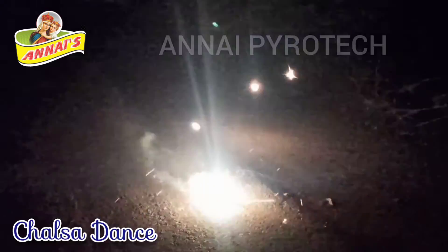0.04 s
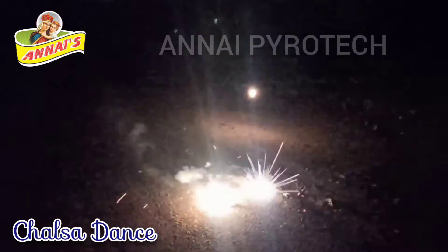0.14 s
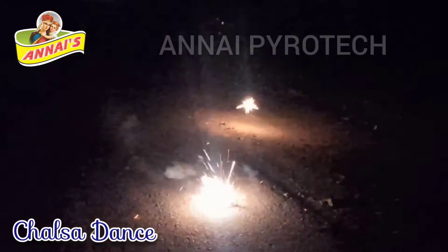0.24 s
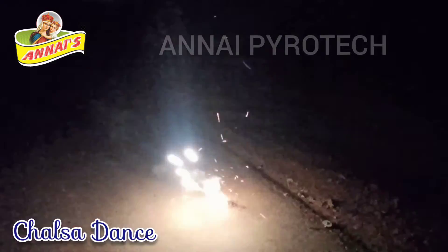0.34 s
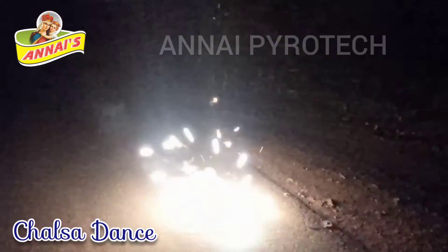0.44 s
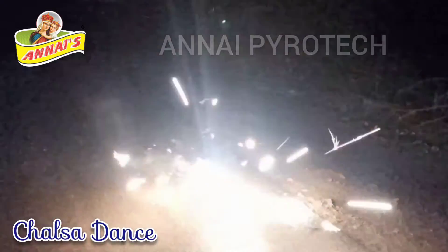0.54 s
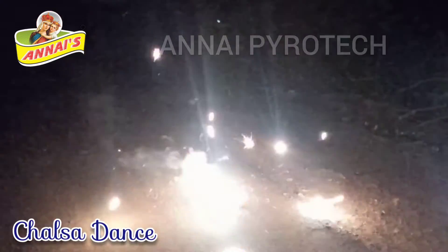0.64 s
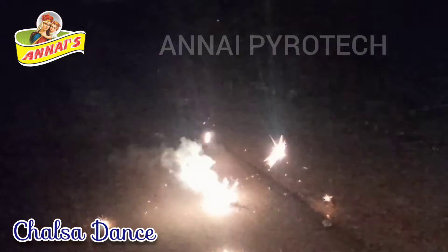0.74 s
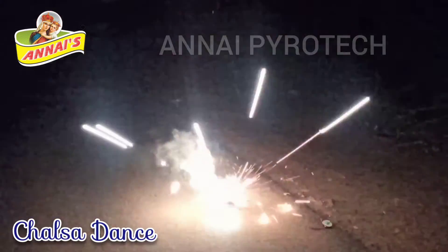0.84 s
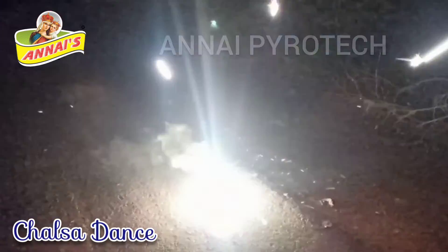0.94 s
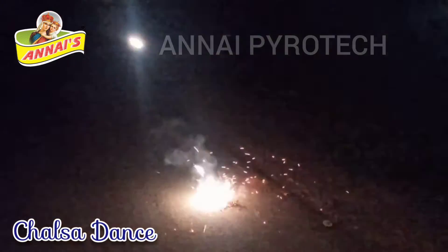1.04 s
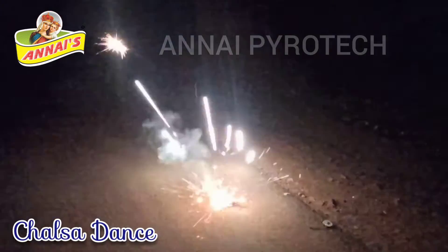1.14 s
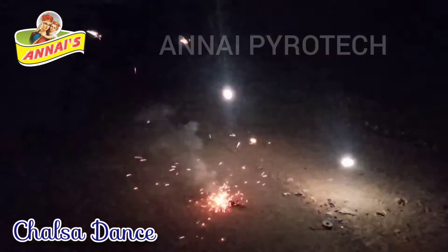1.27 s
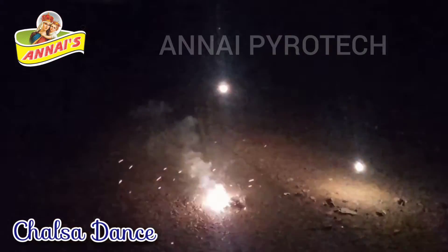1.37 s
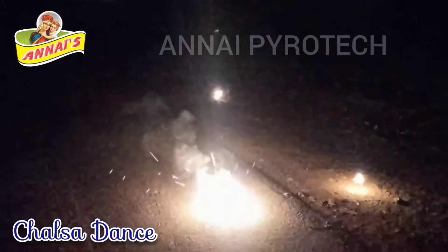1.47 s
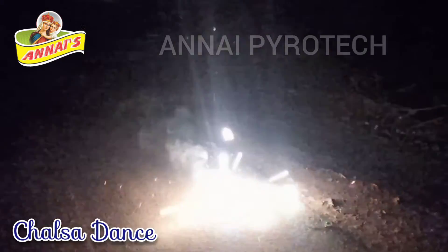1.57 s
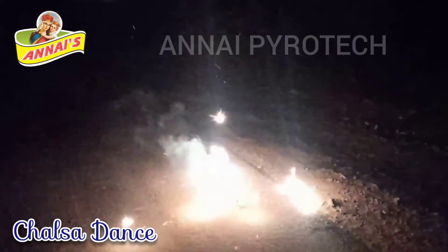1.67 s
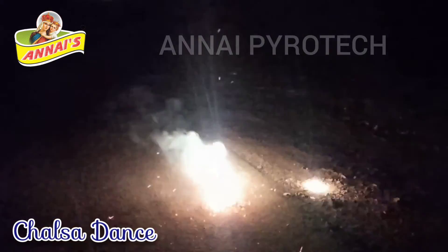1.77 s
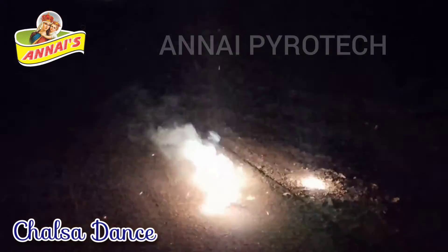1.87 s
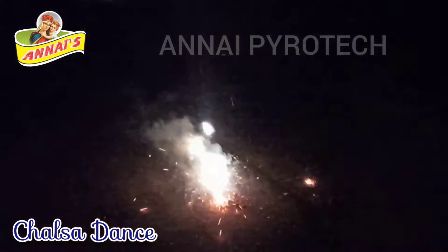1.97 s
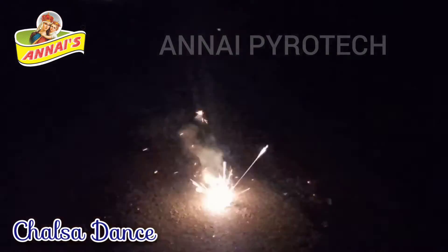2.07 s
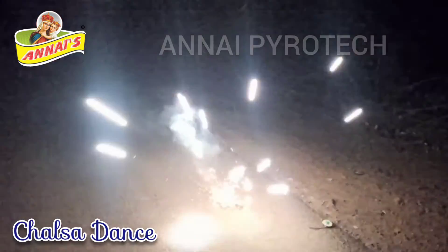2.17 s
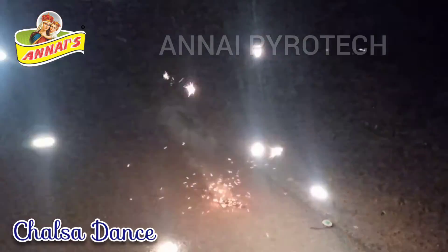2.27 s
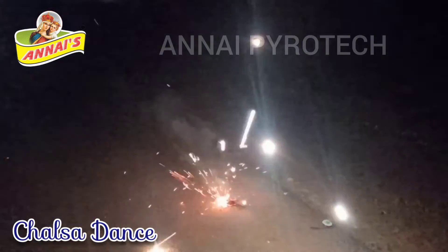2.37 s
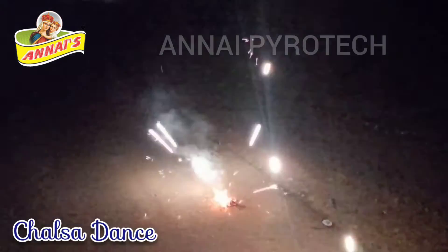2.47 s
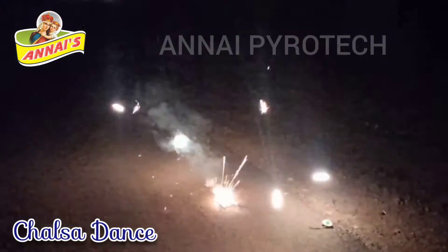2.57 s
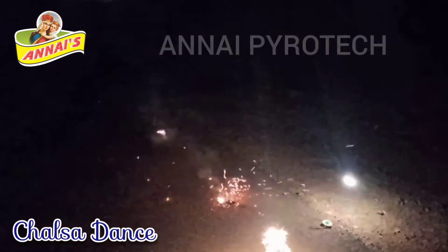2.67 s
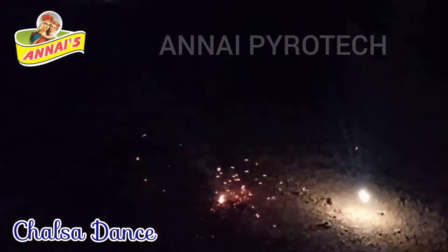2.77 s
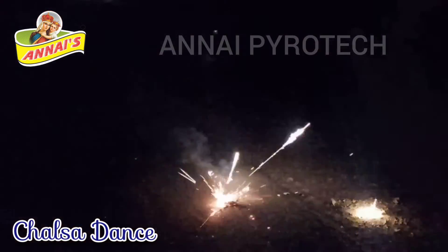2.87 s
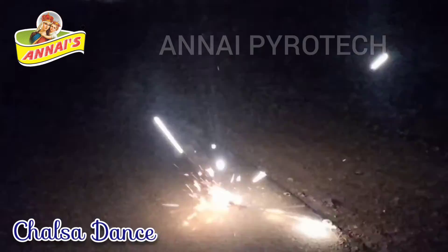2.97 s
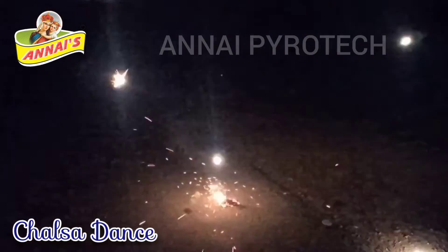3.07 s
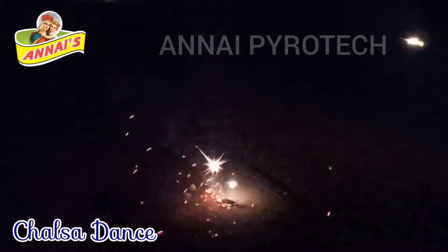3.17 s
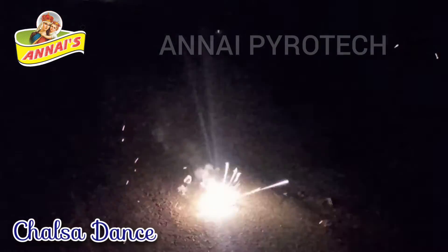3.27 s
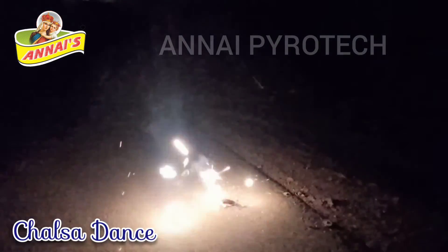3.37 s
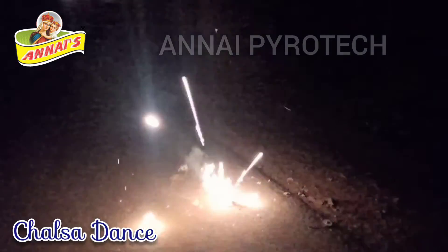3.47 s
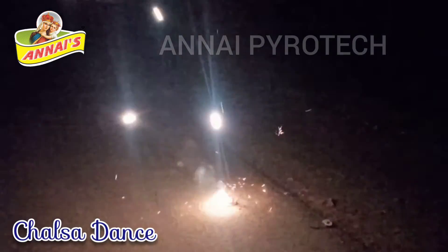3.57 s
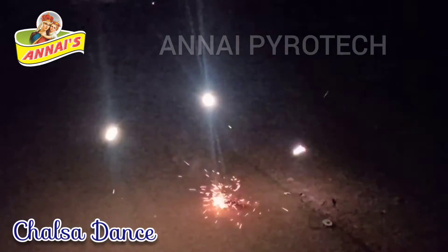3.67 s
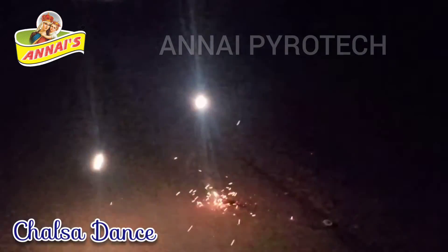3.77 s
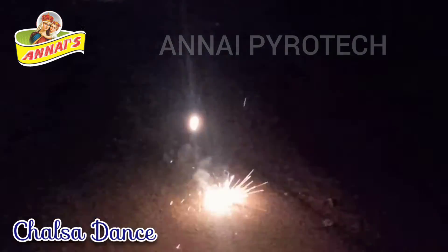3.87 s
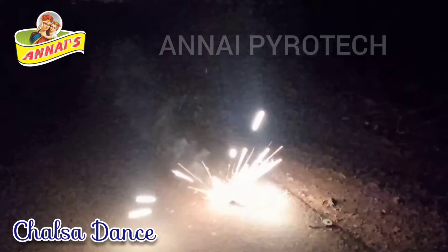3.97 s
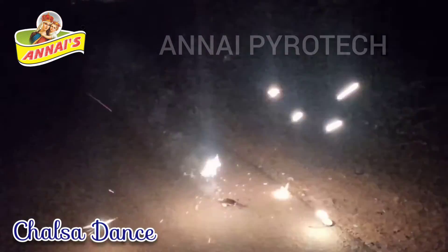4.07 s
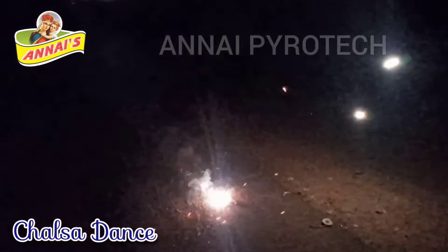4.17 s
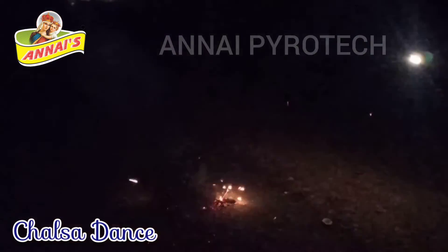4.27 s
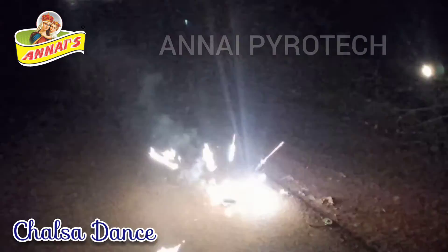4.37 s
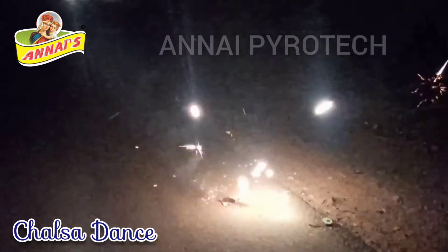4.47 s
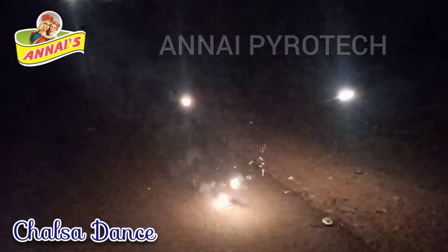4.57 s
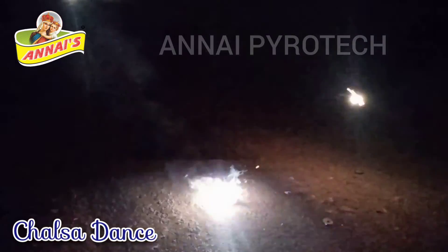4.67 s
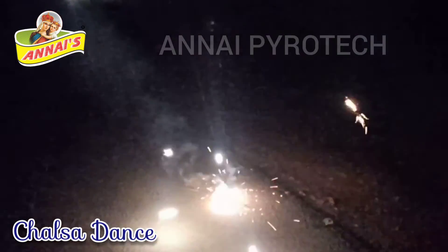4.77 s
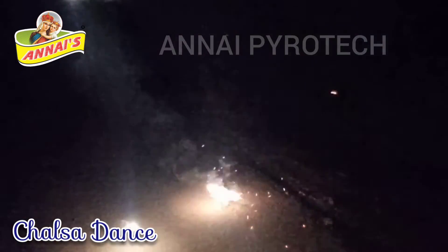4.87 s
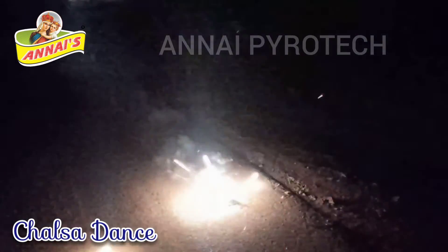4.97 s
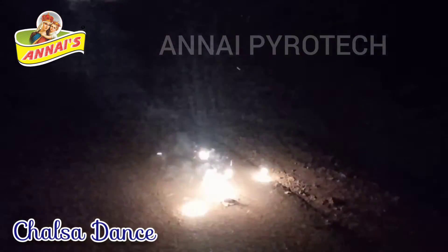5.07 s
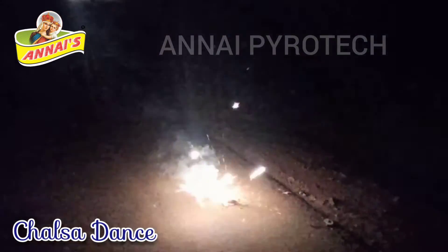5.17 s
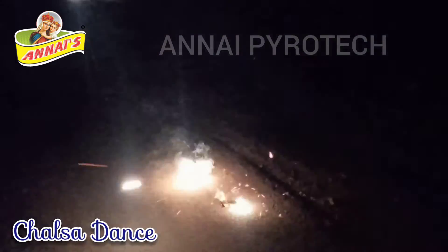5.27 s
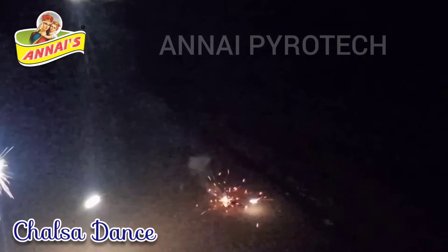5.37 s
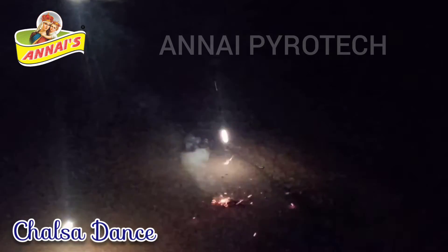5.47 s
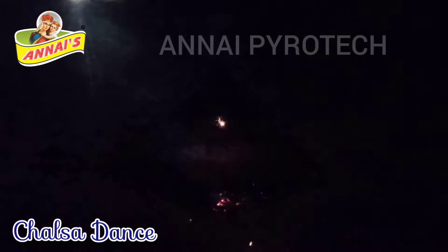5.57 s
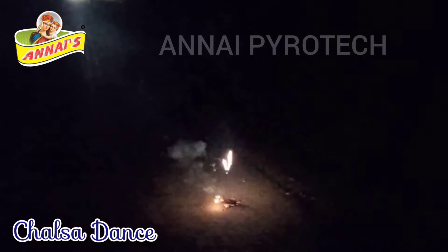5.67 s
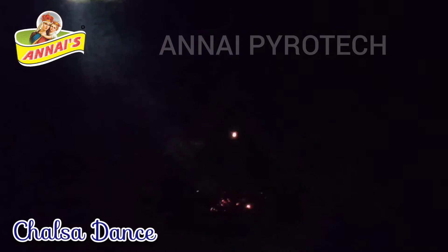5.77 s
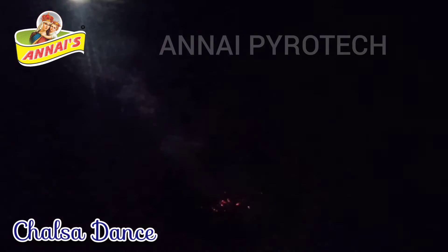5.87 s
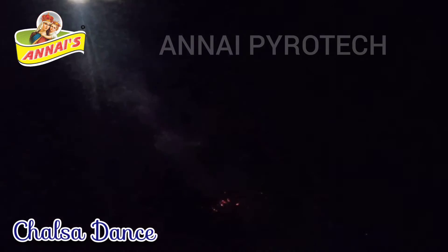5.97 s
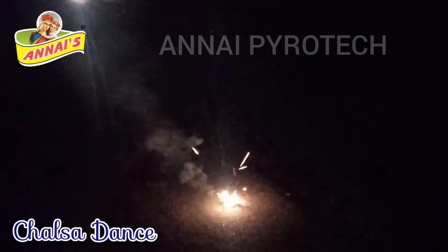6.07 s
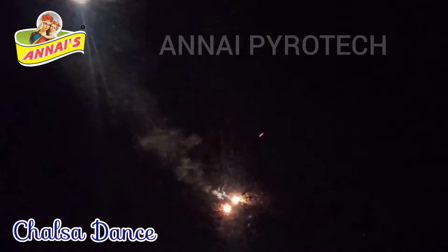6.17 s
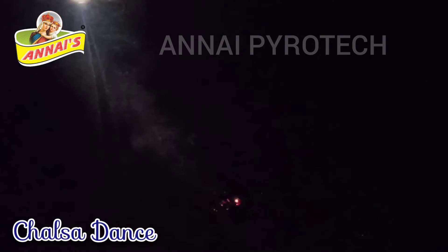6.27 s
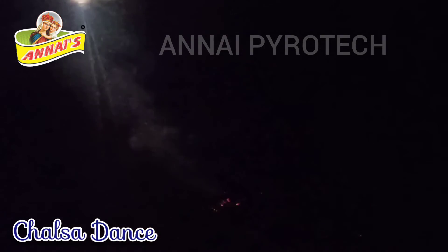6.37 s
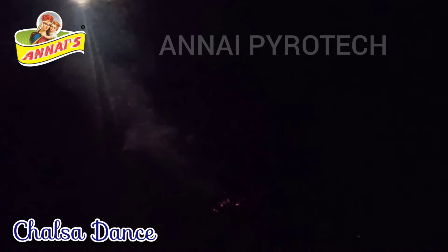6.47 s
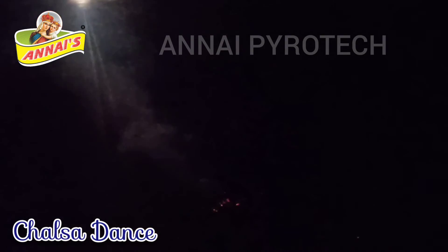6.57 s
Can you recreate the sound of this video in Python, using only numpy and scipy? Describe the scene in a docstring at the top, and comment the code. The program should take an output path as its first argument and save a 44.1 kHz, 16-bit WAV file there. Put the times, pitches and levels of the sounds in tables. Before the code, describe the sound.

A ground firework crackles outdoors at night, sharp irregular pops and heavier bangs with hissy echoes, thinning out to a few last snaps.

```python
"""A low rumble and faint hiss open the night, and at once a ground firework crackles on a dirt road,
a few metres from a small camera's pair of microphone ports. Its pellets crack one after another as shocks
amid a spatter of noise, the big ones with a thump of air (one low cycle), a few as longer, rougher bursts.
The surroundings scatter each crack back as a hissy wash of fading noise; stray sparks tick faintly."""
import sys
import numpy as np
from scipy import signal
from scipy.fft import rfft, irfft
from scipy.io import wavfile
from scipy.ndimage import uniform_filter1d

SR = 44100
rng = np.random.default_rng(int(sys.argv[2]) if len(sys.argv) > 2 else 0)


def output_pcm(signal):
    """Save a mono or channel-first signal as 16-bit PCM at the path in sys.argv[1].

    Samples are clipped to [-1, 1] before scaling.
    """
    pcm = np.clip(np.atleast_2d(signal).T, -1, 1) * 32767
    wavfile.write(sys.argv[1], SR, np.round(pcm).astype(np.int16))


N = 292383

# colour of the night's background: pitch_hz, density_db (dB per Hz, relative)
NIGHT_COLOUR = [(30, -42), (70, -16.5), (109, -3), (190, -10.5), (250, -14), (420, -23.5), (700, -24),
                (1200, -34), (3500, -36.5), (5200, -44), (7500, -27.5), (9000, -65), (13000, -43.5),
                (16000, -44.5)]
# narrow whines within the hiss: pitch_hz, width_hz, gain_db
NIGHT_WHINES = [(4120, 110, 15), (7450, 260, 7)]
# likeness of left and right in the background: pitch_hz, likeness (-1 to 1)
NIGHT_LIKENESS = [(150, 0.95), (700, 0.2), (2000, 0), (8000, .1)]
# the distant rumble comes and goes: time_s, gain_db
RUMBLE_SWELL = [(0, 4), (1.3, -4), (2.7, 0), (3.3, 2.5), (5, 1), (6.5, 2)]
# tilt between the ports in every layer but the thumps: pitch_hz, left_over_right_db
PORT_BALANCE = [(100, -0.5), (700, 2.5), (2600, -2), (4000, 0), (6000, -1.5), (8300, -5.5), (12000, -2.5),
                (15000, -7.5)]
# pellets that burst: start_s, level_db, bright_db (treble tilt),
# boom_db (thump more or less than is usual for the size)
PELLETS = [(0.03, -15.5, 1.5, 1), (0.1481, -22.0, -7.5, -2), (0.2164, -33, 1, 0), (0.2239, -30, 3, 3),
           (0.2598, -14, -3, 6), (0.313, -22, 5, 0), (0.3617, -20.5, 2.0, 0), (0.3928, -22.5, -2, -13),
           (0.4906, -17.5, 1, -5), (0.5316, -29.5, -2, 0), (0.5776, -20, 1.5, -6),
           (0.5816, -16.5, -3.5, -2), (0.6062, -21.0, -1.5, 3), (0.667, -18.0, -4.5, 2),
           (0.7707, -23, 7, -2), (0.8514, -23.5, 9, -4), (0.859, -25, 5, 0), (0.8902, -18, 2.0, 11),
           (0.9181, -16.5, -1.5, 0), (0.9459, -21, 8.5, -7), (1.044, -21, -7.5, -7), (1.0628, -28, 3, 0),
           (1.0846, -24.5, 2, -4), (1.1623, -23, 3.5, -11), (1.1807, -23, 2, -9), (1.225, -15.5, 2, -4),
           (1.4555, -24.5, -1.5, -11), (1.4942, -29.5, 2.5, 0), (1.5355, -20.5, -1.5, -6),
           (1.5542, -16.0, -6, -1), (1.5852, -21, -8, -8), (1.6593, -14.5, 0, 1), (1.7011, -19.5, -4, 12),
           (1.8375, -34.0, -3.5, 0), (1.879, -21, 0.5, -11), (1.9078, -34.5, 4, 0),
           (1.9484, -19.5, 3.0, 3.5), (1.9712, -22, -0.5, -14), (1.992, -33, 1, 0), (2.0947, -34, 10, 2),
           (2.116, -38.5, 17.5, 0), (2.1938, -17, -0.5, 8), (2.2176, -15.5, -2, 7.5),
           (2.23, -18.5, 1, 10.5), (2.4552, -20, -4, -5), (2.5458, -16.5, -0.5, 7.5), (2.702, -17, 0, 3.5),
           (2.9728, -15.5, 1.5, 5), (3.0552, -15, 1.5, -4), (3.2439, -32.5, 9, 0), (3.281, -34, 6, 0),
           (3.3923, -15.5, 3, -4), (3.4316, -21, 6.0, 0), (3.4927, -21.5, 5, -5), (3.5664, -18, 2, 8),
           (3.7143, -18.5, 0.5, 4), (3.8441, -25.0, 2.5, 0), (3.99, -19.5, 1.5, -1),
           (4.0234, -18.5, -0.5, 6), (4.069, -16.5, -5.0, 5), (4.0791, -19.5, 5.5, -8),
           (4.308, -19.5, 3.5, 5.5), (4.4435, -18, 0, 6.5), (4.482, -23.5, -7.5, 6),
           (4.643, -36.5, 8, -2.5), (4.7081, -38.5, -5, 0), (4.7405, -36.5, -10, 0), (4.7734, -40, 5, 0),
           (4.8108, -14.5, 0.5, -1.5), (4.8661, -22, -2, -11), (4.999, -32.5, 7.5, 3),
           (5.0341, -22.5, 0, -16), (5.0402, -26, 10.5, -8), (5.053, -33.0, 1.5, 0),
           (5.1213, -24.5, 1.5, -9), (5.1387, -26, 9, 0), (5.2446, -16.5, 1, 6.5), (5.2495, -20, -6.5, -13),
           (5.3107, -22, 7, 9), (5.463, -17.5, 0.5, 4), (5.4946, -15.5, 8, 5), (5.519, -17, 1.5, -9),
           (5.647, -33, -3, 0), (5.7217, -24, -2.0, -7), (5.7527, -32.5, 7.5, 0), (6.1331, -25, 8.5, 0)]
# broad colour of a crack at the microphone: pitch_hz, density_db (dB per Hz, relative)
CRACK_COLOUR = [(40, -20.5), (130, -9), (230, 5.5), (450, -0.5), (800, 2), (1600, -2.5), (4500, -6),
                (5300, -10), (8200, 1.5), (9200, -14), (11200, -31), (11800, -9.5), (15000, -12.5),
                (16500, -33.5)]
# one hollow and the resonances of the microphone's housing, on cracks and echoes:
# pitch_hz, width_hz, gain_db
HOUSING_MODES = [(1100, 175, -4.5), (2215, 316, 5.5), (3833, 590, 10.5), (4628, 374, 12), (6520, 700, 7),
                 (7470, 168, 8.5)]
# likeness of left and right in a crack: pitch_hz, likeness (-1 to 1)
CRACK_LIKENESS = [(200, 0.2), (1100, 0.98), (1600, -.5), (2200, 0.75), (4700, 0.81), (5600, 0.95),
                  (12000, 0.07)]
# colour of the scattered echo: pitch_hz, density_db (dB per Hz, relative)
ECHO_COLOUR = [(40, -13), (150, -7.5), (400, 1.5), (800, 1), (1500, -1), (2600, 2), (5200, -3), (6500, 3.5),
               (8300, 3), (9100, -29), (11200, -61), (11700, -5), (15000, -9), (16300, -31)]
# time the echo takes to fall by 60 dB: pitch_hz, decay_s
ECHO_DECAY = [(100, 0.18), (700, 0.35), (3000, 0.45), (7500, 0.55), (14000, 0.44)]
# likeness of left and right in an echo: pitch_hz, likeness (-1 to 1)
ECHO_LIKENESS = [(300, 1), (800, 0.38), (1450, -0.39), (2100, 0.16), (3200, 0.18), (12000, -0.037)]
# longer, rougher bursts, each a crack in a drawn-out spatter: start_s, level_db, length_ms
ROUGH_BURSTS = [(0.205, -29, 3.6), (0.7646, -25, 4.6), (2.0869, -33.5, 3.7), (5.7249, -19.5, 2.3),
                (6.1206, -24, 5.2), (6.129, -32.5, 2.7), (6.1656, -35, 5.2)]

NIGHT_DB = -54.5  # rms before the rumble swells
EDGE_HZ = 16300  # top of the microphone's band
# a full-sized pellet: its crack, its thump and its echo
FULL_DB, THUMP_DB, ECHO_DB = -18, -35.5, -36.5
# dB of thump and of echo gained for each dB of crack: big pellets boom, small ones only snap
THUMP_GROWTH, ECHO_GROWTH = 2, 2.19
# length of the smallest snap, and what a full charge adds to it
SNAP_MS, CHARGE_MS = 0.66, 0.16
# stray sparks tick at random until BURN_S, shortly before the last pellets
BURN_S, SPARKS_PER_S, SPARK_DB = 5.9, 7.7, -46.5
# treble tilt of a rough burst; its thump and echo against its crack
ROUGH_BRIGHT_DB, ROUGH_THUMP_DB, ROUGH_ECHO_DB = 3, -31, -31


def amp(db):
    """Decibels to gain."""
    return 10 ** (np.asarray(db) / 20)


def evened(x):
    """Scales to an rms of one."""
    return x / np.sqrt(np.mean(x ** 2) + 1e-20)


def rfft_hz(size):
    """The frequencies of a spectrum of this many samples."""
    return np.fft.rfftfreq(size, 1 / SR)


def read(points, hz):
    """Joins (Hz, value) points on a log-frequency axis."""
    point_hz, value = np.transpose(points)
    return np.interp(np.log(hz + 1), np.log(point_hz + 1), value)


def humps(modes, hz):
    """The dB curve of a few resonances."""
    return sum(db / (1 + (2 * (hz - centre) / width) ** 2) for centre, width, db in modes)


def add(mix, s, sound):
    """Mixes a stereo sound in, starting at s; whatever falls outside is cut."""
    start = round(s * SR)
    sound = sound[:, max(-start, 0):]
    part = mix[:, max(start, 0):][:, :sound.shape[1]]
    part += sound[:, :part.shape[1]]


def pair(z, likeness, hz):
    """Turns two spectra into a partly alike left and right, tilted by the balance of the ports."""
    same = read(likeness, hz)
    lean_db = read(PORT_BALANCE, hz) / 2
    left = z[0] * amp(lean_db)
    right = (same * z[0] + np.sqrt(1 - same ** 2) * z[1]) * amp(-lean_db)
    return np.array([left, right])


def causal(db):
    """The response with this dB curve that rings only after it is struck."""
    log_gain = np.log(amp(np.r_[db, db[-2:0:-1]]))
    return np.exp(np.conj(signal.hilbert(log_gain)))[:len(db)]


def night(split_hz=300):
    """A slowly swelling low rumble under a faint steady hiss, both cut from one coloured noise."""
    hz = rfft_hz(N)
    z = pair(rfft(rng.standard_normal((2, N))), NIGHT_LIKENESS, hz)
    colour_db = read(NIGHT_COLOUR, hz) + humps(NIGHT_WHINES, hz)
    air = evened(irfft(z * amp(colour_db), N))
    rumble = irfft(rfft(air) / (1 + (hz / split_hz) ** 4), N)
    hiss = air - rumble
    swell = amp(np.interp(np.arange(N) / SR, *np.transpose(RUMBLE_SWELL)))
    return amp(NIGHT_DB) * (hiss + swell * rumble)


def pop(s, db, bright_db, boom_db=0):
    """The size of a pellet sets how long it takes to go off, how much air it shifts and its echo level."""
    size_db = db - FULL_DB
    length_ms = SNAP_MS + CHARGE_MS * amp(size_db)
    thump_db = THUMP_DB + THUMP_GROWTH * size_db + boom_db
    echo_db = ECHO_DB + ECHO_GROWTH * size_db
    return s, db, length_ms, bright_db, thump_db, echo_db


def thumps(bursts, width_s=0.0017, apart_rad=0.77):
    """The hot gas pushes the air out and sucks it back: one low cycle that meets each port differently."""
    u = np.arange(-5, 5, 1 / (SR * width_s))
    bell = np.exp(.5 - .5 * u ** 2)
    out = np.zeros((2, N))
    for s, _, _, _, db, _ in bursts:
        side = rng.choice([1, 1, -1])
        # the phase turns the cycle from a push and pull towards a single bump
        phase = apart_rad * np.array([[1], [-1]]) * side + rng.uniform(-0.83, 0.64)
        push = (-u * np.cos(phase) + (1 - u ** 2) * np.sin(phase)) * bell
        add(out, s + u[0] * width_s, amp(db) * push)
    return out


def cracks(bursts, size=2048, spatter=0.52, spread=0.92, uneven_db=4, blur_db=-22, blur_ms=8,
           dull_hz=4500, body_hz=700, span_ms=6.1):
    """Each pellet bursts as one shock amid a spatter of tiny ones; a brief hiss blurs the strong cracks."""
    ms = (np.arange(size) - size // 2) * 1000 / SR
    hz = rfft_hz(size)
    treble = np.clip(np.log2((hz + 1) / 3800) / 2, -.5, .5)
    blur = np.exp(-abs(ms) / blur_ms) * signal.windows.tukey(size, .6)
    # the main shock carries the body of the bang and reaches the two ports 7 samples apart
    clicks = 4 * np.array([ms == 0, np.roll(ms == 0, 7)])
    shock = rfft(clicks) / (1 + 1j * hz / dull_hz)
    thin = hz / np.hypot(hz, body_hz)  # takes the body out of the spatter
    colour = causal(read(CRACK_COLOUR, hz))
    out = np.zeros((2, N))
    for s, db, length_ms, bright_db, _, echo_db in bursts:
        # a longer burst has a wider spatter and a stronger shock
        burst = np.exp(-abs(ms) / (spread * length_ms))
        sizes = evened(amp(uneven_db * np.repeat(rng.standard_normal(size // 8), 8)))
        edges = blur * amp(blur_db + 0.44 * (echo_db + 55.0))
        bits = spatter * (burst * sizes + edges) * rng.standard_normal((2, size))
        z = pair(thin * rfft(bits) + np.sqrt(length_ms) * shock, CRACK_LIKENESS, hz)
        # pellets burst at all heights and angles: ground reflection and housing colour differ each time
        delay_s = rng.uniform(.0003, .0016)
        ground = 1 + .25 * np.exp(-2j * np.pi * hz * delay_s)
        housing_db = (1 + 0.22 * rng.uniform(-0.47, 1)) * humps(HOUSING_MODES, hz)
        crack = irfft(z * ground * colour * amp(housing_db + bright_db * treble))
        # the level is the rms as if all the energy lay within span_ms
        add(out, s - size / 2 / SR, amp(db) * evened(crack) * np.sqrt(span_ms / np.ptp(ms)))
    return out


def echoes(bursts, hold_s=0.045, grain_db=3, patchy_db=2.0, housing_share=0.55, size=32768):
    """Rough ground and far objects scatter a crack: the wash holds for a moment, then dies."""
    hz, t, _ = signal.stft(np.zeros(size), SR, nperseg=256)
    t = t[:, None]
    fade_db = -60 * np.maximum(t - hold_s, 0) / read(ECHO_DECAY, hz)
    colour = amp(read(ECHO_COLOUR, hz) + housing_share * humps(HOUSING_MODES, hz))
    shape = evened(colour) * amp(fade_db)
    out = np.zeros((2, N))
    for s, _, _, _, _, db in bursts:
        # some reflectors are stronger than others, and each has its own colour
        grains = evened(amp(grain_db * np.repeat(rng.standard_normal(size // 32), 32)))
        patches = uniform_filter1d(rng.standard_normal(shape.shape), size=4, axis=0)
        patches = uniform_filter1d(patches, size=9, axis=1)
        noise = grains * rng.standard_normal((2, size))
        z = signal.stft(noise, SR, nperseg=256)[2].swapaxes(1, 2)
        z = pair(z, ECHO_LIKENESS, hz) * shape * evened(amp(patchy_db * evened(patches)))
        wash = signal.istft(z.swapaxes(1, 2), SR, nperseg=256)[1]
        add(out, s, amp(db) * wash)
    return out


def sparks(count=80, spread_db=3, colour_db=6):
    """Tiny pops at random moments, each of its own size and brightness."""
    gap, size, bright = rng.random((count, 3)).T
    times = np.cumsum(-np.log(1 - gap)) / SPARKS_PER_S
    levels_db = SPARK_DB + spread_db * (2 * size - 1)
    brights_db = colour_db * (2 * bright - 1)
    rows = zip(times, levels_db, brights_db)
    return [pop(*row) for row in rows if row[0] < BURN_S]


def rough_burst(s, db, length_ms):
    """A longer, rougher burst: a crack in a drawn-out spatter, with little thump or echo."""
    return s, db, length_ms, ROUGH_BRIGHT_DB, db + ROUGH_THUMP_DB, db + ROUGH_ECHO_DB


def scene():
    """The night, the firework and its echoes; sparks only crack, with no thump or echo."""
    # a burst is start_s, level_db, length_ms, bright_db, thump_db, echo_db
    bursts = [pop(*row) for row in PELLETS] + [rough_burst(*row) for row in ROUGH_BURSTS]
    firework = thumps(bursts) + cracks(bursts) + echoes(bursts)
    return night() + firework + cracks(sparks())


def record(dry, ceiling=0.67):
    """The microphone's overload rounds off the loudest peaks; then its band limit cuts the top."""
    rounded = dry / (1 + (dry / ceiling) ** 6) ** (1 / 6)
    band = signal.firwin(255, EDGE_HZ, window=("kaiser", 9), fs=SR)
    return signal.oaconvolve(rounded, band[None], "same")


dry = scene()
out = record(dry)
output_pcm(out)
```